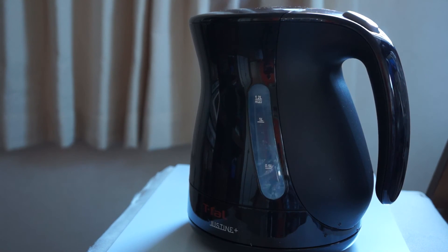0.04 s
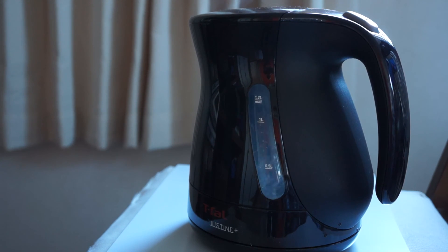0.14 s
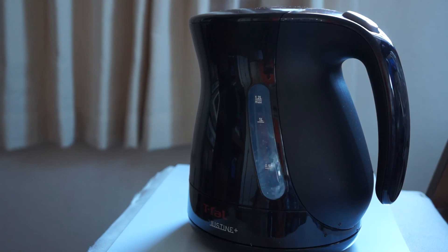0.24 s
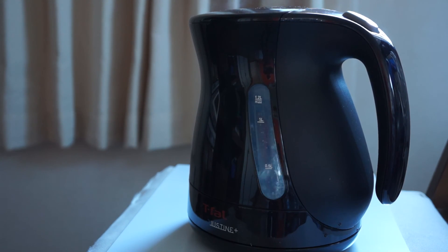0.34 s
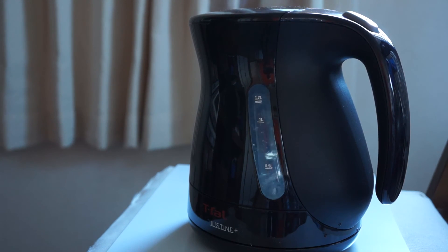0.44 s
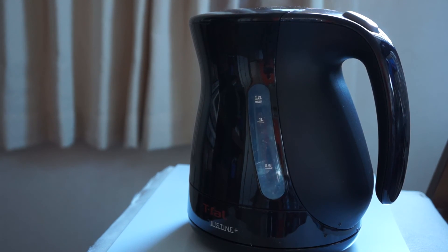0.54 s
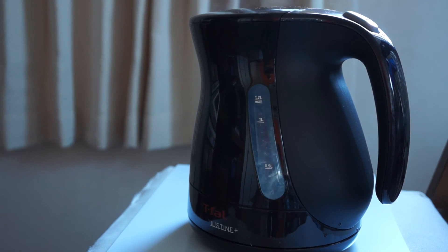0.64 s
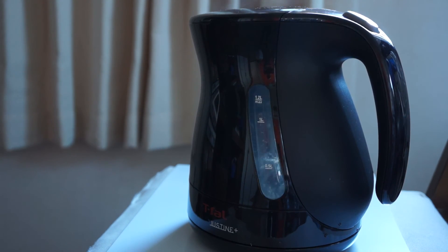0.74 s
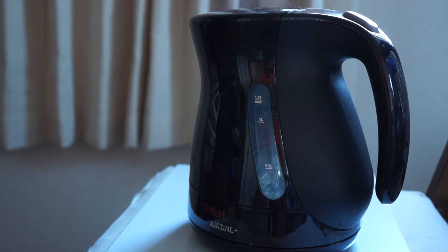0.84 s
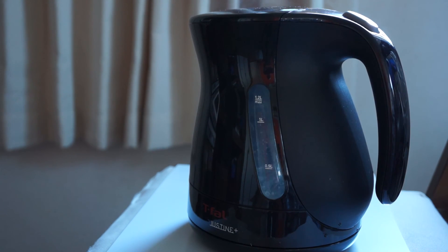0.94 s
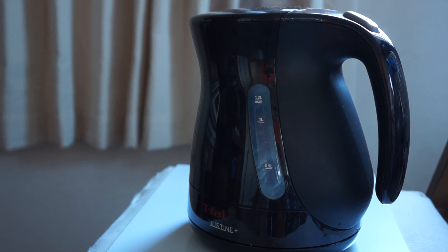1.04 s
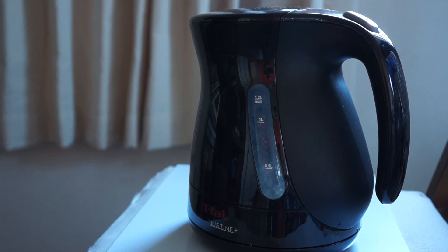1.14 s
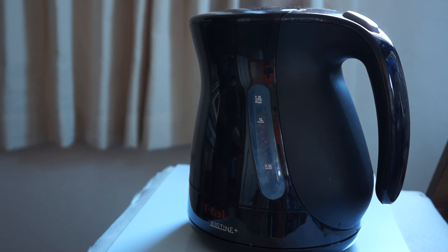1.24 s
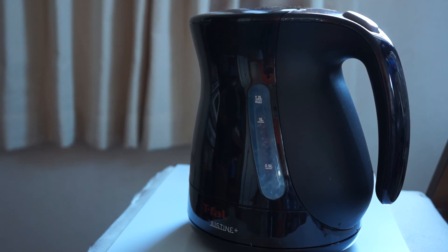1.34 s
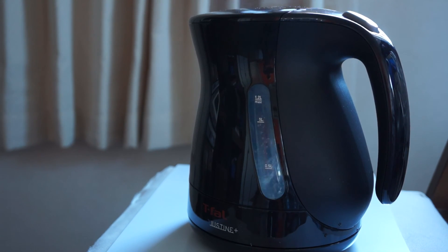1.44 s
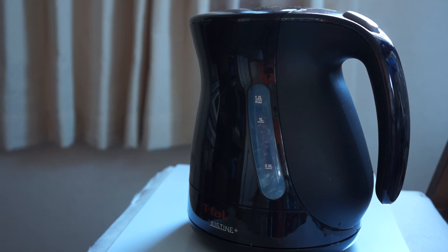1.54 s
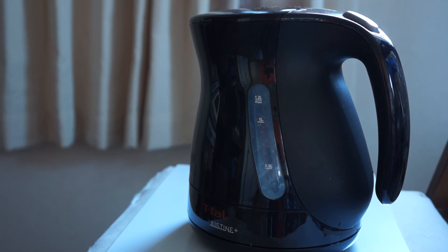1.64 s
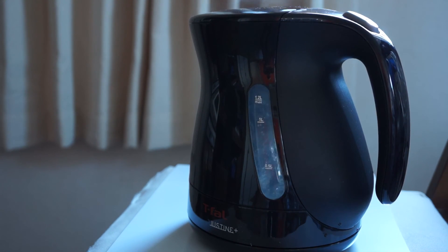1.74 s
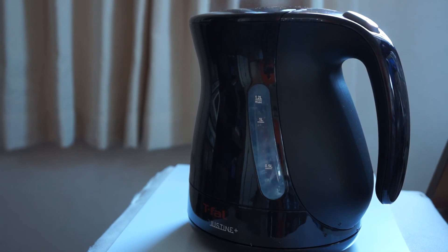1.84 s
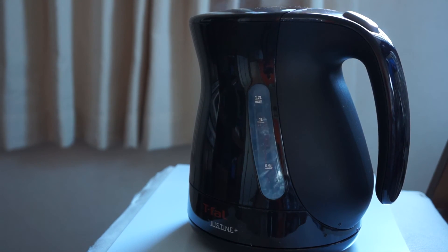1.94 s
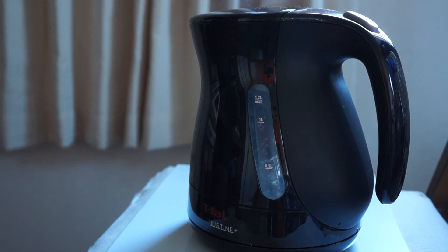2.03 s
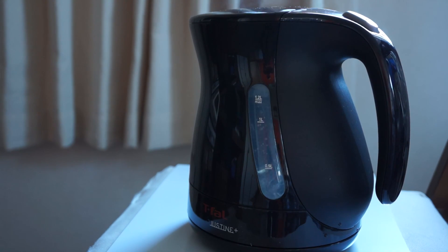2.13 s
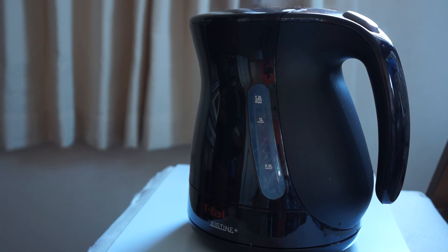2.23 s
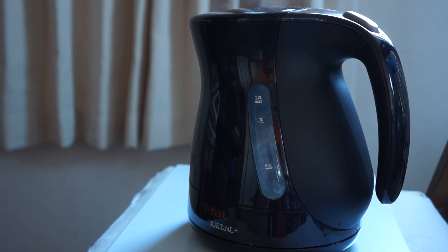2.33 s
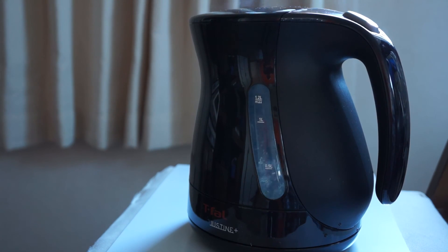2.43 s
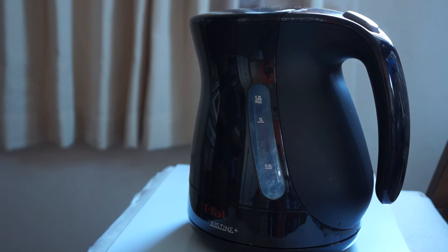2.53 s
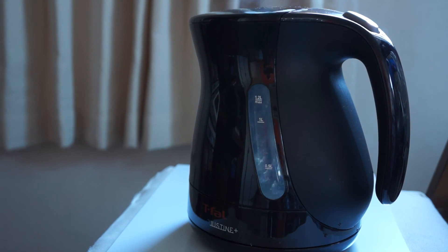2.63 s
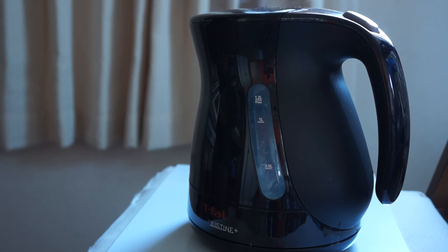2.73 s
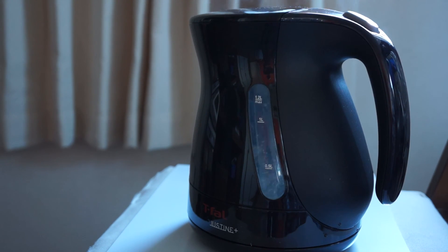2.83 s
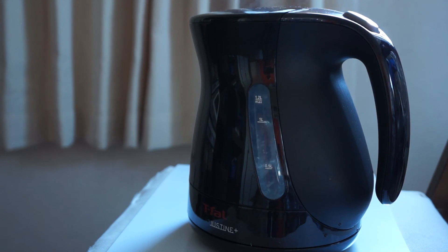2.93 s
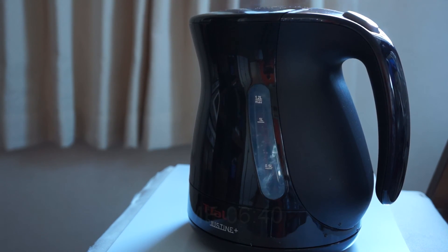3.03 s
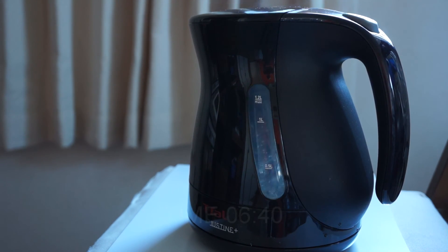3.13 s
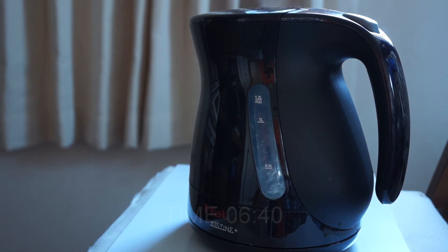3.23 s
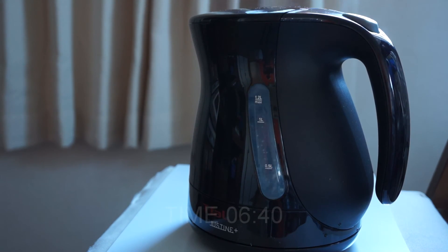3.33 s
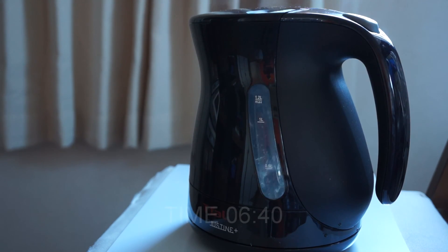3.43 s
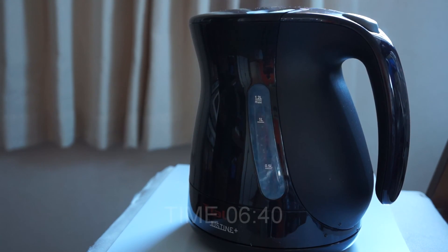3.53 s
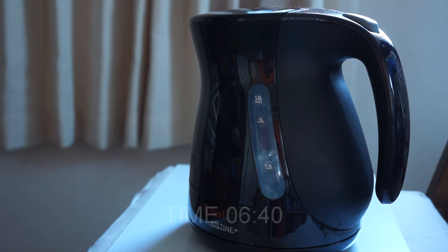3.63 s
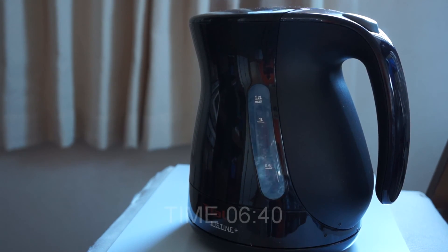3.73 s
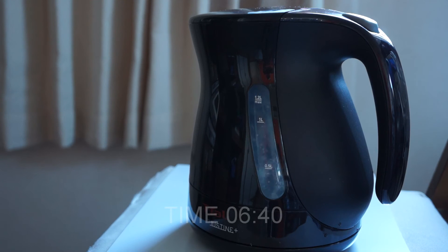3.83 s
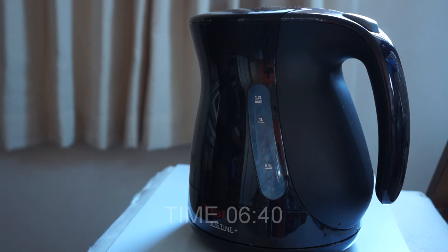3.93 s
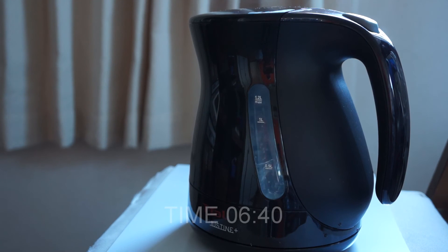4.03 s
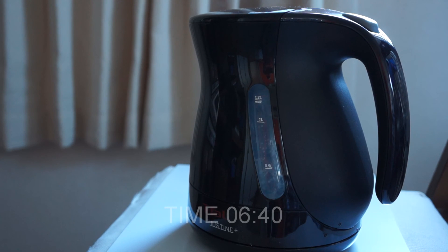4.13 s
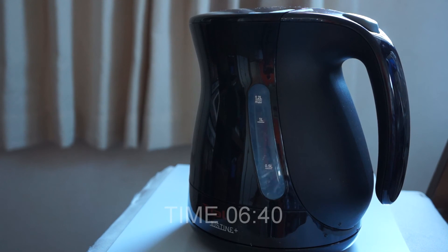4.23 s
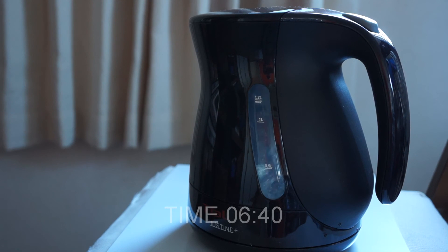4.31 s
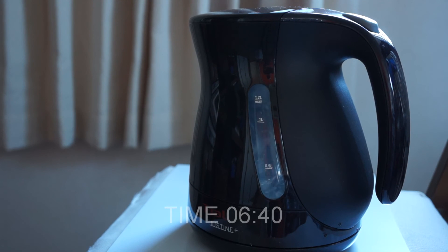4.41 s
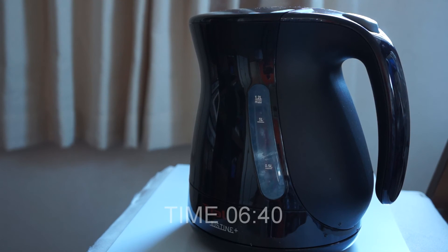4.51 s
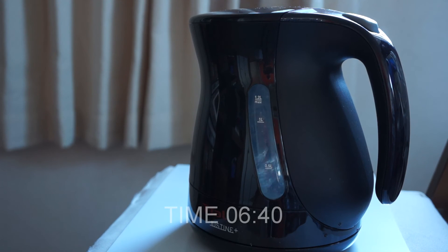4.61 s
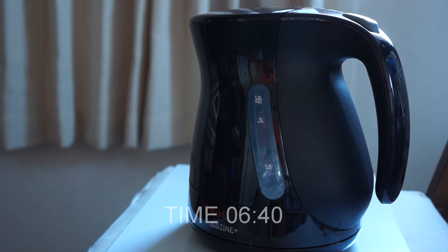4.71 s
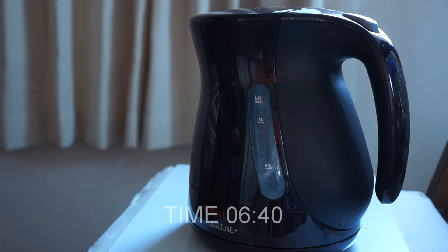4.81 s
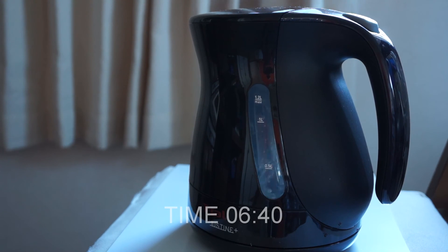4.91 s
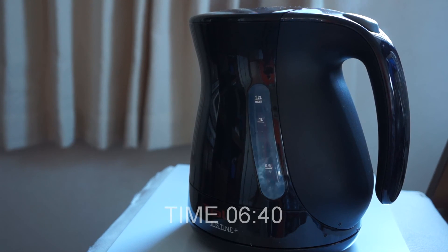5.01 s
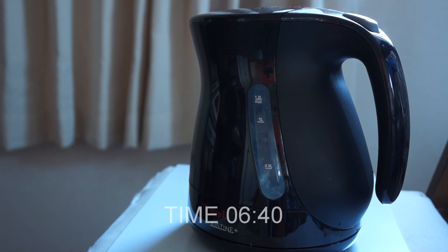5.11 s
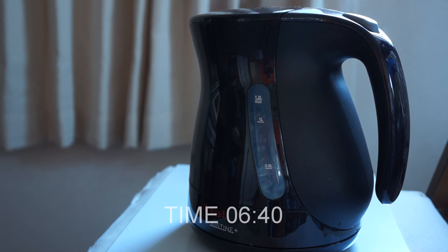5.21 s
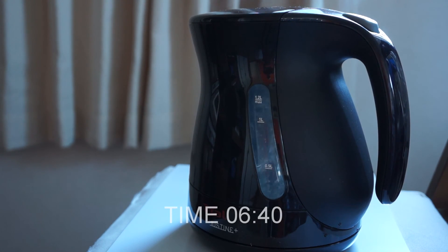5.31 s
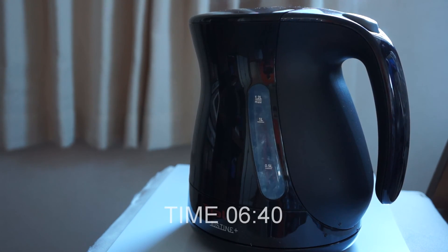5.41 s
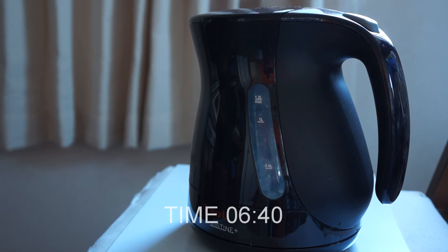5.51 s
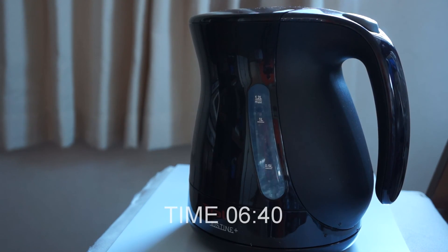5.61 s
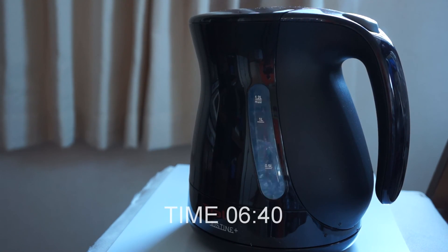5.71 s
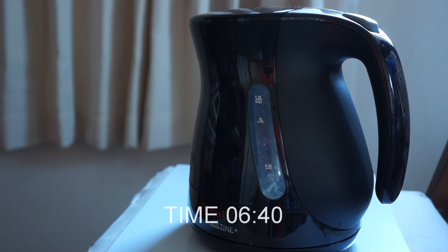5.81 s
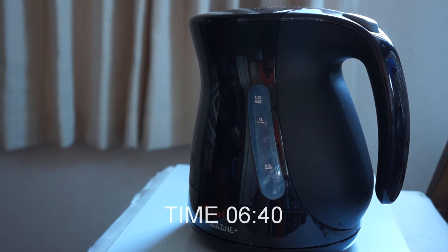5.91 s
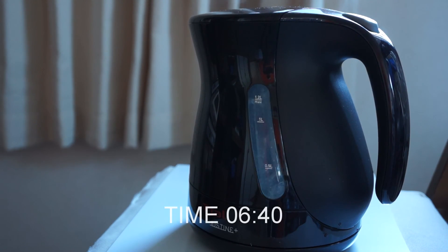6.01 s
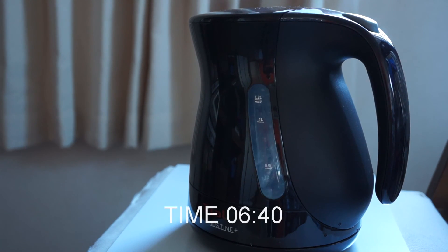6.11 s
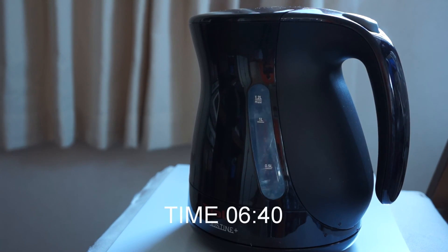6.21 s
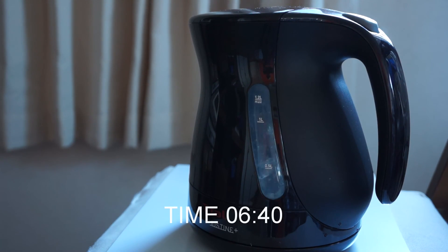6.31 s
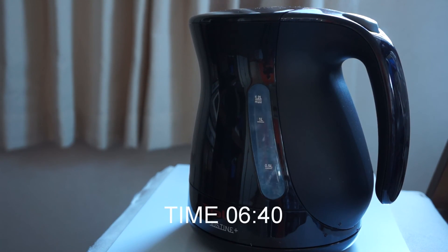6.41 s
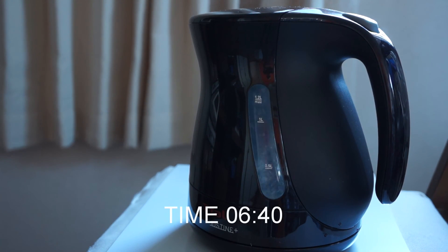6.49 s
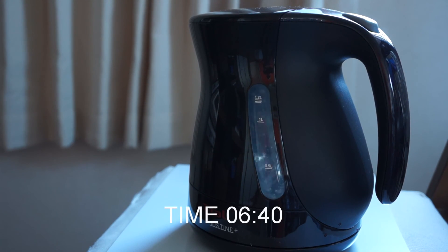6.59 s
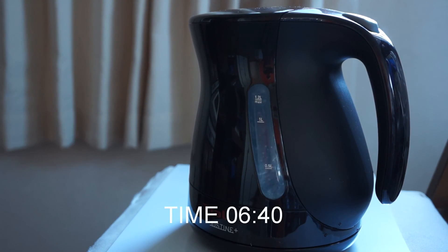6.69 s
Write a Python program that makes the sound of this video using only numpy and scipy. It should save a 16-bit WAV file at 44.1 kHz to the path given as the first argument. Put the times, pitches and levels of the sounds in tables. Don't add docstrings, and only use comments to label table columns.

```python
import sys
import numpy as np
from scipy import signal
from scipy.fft import rfft, irfft, next_fast_len
from scipy.io import wavfile
from scipy.ndimage import map_coordinates

SR = 44100
rng = np.random.default_rng(int(sys.argv[2]) if len(sys.argv) > 2 else 0)


def wav_record(signal):
    frames = np.transpose(np.atleast_2d(signal))
    bounded = np.clip(frames, -1, 1)
    quanta = np.round(bounded * 32767).astype(np.int16)
    wavfile.write(sys.argv[1], SR, quanta)


def magnitude_from_level(level_db):
    exponent = np.asarray(level_db, float) / 20
    return 10 ** exponent


N = 297675

# pitch_hz [Hz], level_db [dB per Hz]
RUMBLE_COLOUR = [(15, -50), (25, -21), (49, -15), (62, -6), (81, -7), (100, -6), (112, 2), (126, -7),
                 (150, -12), (220, -27), (370, -120)]
# pitch_hz [Hz], level_db [dB per Hz]
SWAY_COLOUR = [(15, -72), (25, -42), (48, -10), (81, 0), (101, -6.5), (119, -39), (150, -39), (200, -64),
               (330, -120)]
# pitch_hz [Hz], level_db [dB per Hz]
HISS_COLOUR = [(20, -120), (300, 7.5), (3000, 5), (7000, 2), (12000, 1), (15500, 0), (20000, -4)]
# pitch_hz [Hz], t60_s [s]
ROOM_DECAY = [(300, 0.14), (2000, 0.25), (5000, 0.22), (12000, 0.13)]
# pitch_hz [Hz], share [ratio]
ECHO_SPREAD = [(300, 0.11), (3000, 0.71), (12000, 0.29)]
# pitch_hz [Hz], likeness [0 to 1]
KETTLE_LIKENESS = [(300, 1), (1500, 0.9), (3000, 0.89), (6000, 0.91), (14000, 0.37)]
# pitch_hz [Hz], level_db [dB per Hz]
SNAP_ECHO_COLOUR = [(150, -38), (250, -39), (421, -10), (484, 3), (557, -4), (662, -34), (1700, -13.5),
                    (9330, -29.5), (16000, -42)]
# start_s [s], peak_db [dB], pitch_hz [Hz], brightness_db [dB]
LID_DROPS = [(1.667, -40, 2000, -15), (0.803, -32.5, 3030, -35), (0.822, -32.5, 3910, -30),
             (1.2855, -34, 2000, -19), (1.4562, -32, 3100, -22), (1.7823, -42, 2920, -28),
             (1.8366, -42, 3110, -12), (2.11, -43, 3560, -21), (2.1864, -36, 2660, -30),
             (2.1933, -21.5, 4970, -15), (2.764, -42, 2560, -22), (2.871, -40, 3810, -19),
             (3.008, -45, 2960, -22), (3.312, -38, 2950, -22), (3.721, -41, 2820, -20),
             (3.7542, -26.5, 3220, -19), (3.7629, -26.5, 3420, -16), (3.8187, -41, 2750, -23),
             (4.2217, -36, 2900, -27), (4.768, -38, 2880, -23), (5.036, -38.5, 4400, -15),
             (5.611, -41, 2730, -27), (5.6284, -39, 2790, -14), (5.6377, -27.5, 3150, -14),
             (5.67, -28, 3020, -12), (5.7133, -42, 2760, -23), (5.818, -40, 3870, -18),
             (5.9333, -42, 2740, -22)]
# pitch_hz [Hz], level_db [dB per Hz]
SPLASH_COLOUR = [(500, -59), (1200, 5), (2200, -12), (3200, 12), (5500, 3.5), (7000, -4), (12000, -17),
                 (16000, -27)]
# pitch_hz [Hz], level_db [dB per Hz]
EDGE_COLOUR = [(4000, -34), (7000, -3), (9500, 2.5), (12000, -13), (16000, -16)]
# pitch_hz [Hz], level_db [dB per Hz]
DROP_ECHO_COLOUR = [(800, -19), (2000, 0.5), (3200, 3.5), (5500, -0.5), (7000, -14), (11000, -18),
                    (16000, -35)]
# start_s [s], peak_db [dB], t60_s [s]
SWITCH_BLOWS = [
    (3.1735, -23, .008),
    (3.1755, -12, .01),
    (3.1784, -4, .007),
    (3.18, -8, .005),
    (3.1808, -4, .005),
    (3.1816, -4, .007),
    (3.1893, -14, .006),
]
# pitch_hz [Hz], level_db [dB per Hz]
SNAP_COLOUR = [(120, -51), (250, -20), (500, -8), (800, 0), (1450, -1.5), (2100, -6), (3190, -15),
               (4430, -4), (6880, -24.5), (11000, -16.5), (12500, -32), (16000, -42)]
# pitch_hz [Hz], level_db [dB], t60_s [s]
SHELL_MODES = [(325, -14, 0.048), (446, 0, 0.043), (494, 3, 0.021), (560, 3, 0.12), (726, -3.5, 0.036),
               (836, -20, .03), (990, -19, 0.016), (1174, -18, 0.17), (1370, -4, 0.066), (1498, 8.5, 0.02),
               (2070, -2.5, 0.029), (2780, -5, 0.029), (4630, 2, .012), (10900, -10, .006)]
# start_s [s], level_db [dB]
VIGOUR = [(0.0, -40), (0.41, -42.5), (1.05, -38.5), (1.45, -41), (3.03, -40), (3.18, -40), (3.99, -41),
          (4.44, -41), (4.87, -42), (4.98, -41.5), (6.75, -43)]
# pitch_hz [Hz], level_db [dB per Hz]
DRUM_COLOUR = [(76, -64), (130, -20), (165, -23.5), (184, -8.5), (200, -16.5), (246, -9.5), (330, -5.5),
               (400, -2.5), (480, -1), (540, -4), (600, -11), (800, -17), (1040, -40.5), (1760, -120)]
# pitch_hz [Hz], level_db [dB per Hz]
BURBLE_COLOUR = [(380, -32), (650, 0), (849, 0.5), (1160, -4), (1330, 3), (1520, -5.5), (1810, -3.5),
                 (1900, -4.5), (2600, -30.5), (3380, -19.5), (5720, -120)]
# pitch_hz [Hz], level_db [dB per Hz]
FIZZ_COLOUR = [(1350, -23), (2300, 3.5), (2560, -5.5), (2900, -3.5), (3700, -3.5), (4300, -4.5),
               (4900, -10.5), (5860, -16.5), (7000, -17.5), (9100, -37), (15400, -120)]
# pitch_hz [Hz], level_db [dB per Hz]
SLAP_COLOUR = [(120, -59), (300, -7.5), (600, 2.5), (1500, -2), (2300, -5), (3500, -19), (6000, -25),
               (12000, -45)]
# start_s [s], peak_db [dB], pitch_hz [Hz]
LARGE_BURSTS = [(0.158, -32, 473), (0.265, -26, 484), (0.511, -27.5, 357), (0.569, -46, 417),
                (0.593, -32, 468), (0.629, -27, 407), (1.064, -29, 456), (1.201, -30, 464),
                (1.533, -30, 476), (1.582, -35, 363), (1.655, -28, 500), (2.007, -24, 410),
                (2.267, -25, 444), (2.376, -25.5, 510), (2.426, -31, 463), (2.594, -23.5, 471),
                (2.776, -27, 470), (2.934, -30, 490), (3.091, -27, 450), (3.547, -28.5, 417),
                (3.715, -25, 436), (3.808, -26.5, 613), (4.091, -27.5, 433), (4.244, -27, 450),
                (4.298, -28, 474), (4.425, -29, 509), (4.875, -24, 380), (4.921, -28.5, 367),
                (5.44, -27, 470), (6.377, -25, 439)]
# start_s [s], peak_db [dB], pitch_hz [Hz], slap_db [dB]
SHARP_BURSTS = [(0.088, -31, 867, -18), (0.362, -32.5, 1150, -13), (0.38, -29.5, 1080, -15),
                (0.631, -40, 1270, -10), (0.656, -30, 1190, -12), (0.708, -28, 910, -7.5),
                (0.873, -33.5, 1280, -4.5), (1.148, -31, 940, -24), (1.173, -36, 912, -15),
                (1.313, -28.5, 840, -11), (1.618, -26.5, 1680, -10), (1.78, -34.5, 1300, -3),
                (1.834, -31, 1290, -10), (1.92, -34, 974, -12), (2.193, -32, 1370, -4),
                (2.376, -28.5, 720, -11), (3.009, -30, 1840, -9), (3.595, -32.5, 664, -1.5),
                (3.621, -34, 1250, -14), (3.946, -29, 714, -7), (4.831, -31, 883, -1.5),
                (4.981, -35, 1800, -1), (5.051, -30, 860, -16), (5.452, -31.5, 904, -14),
                (5.818, -26.5, 1630, -6), (5.925, -29.5, 1280, -7.5), (6.227, -32, 821, -22),
                (6.391, -24, 990, -16), (6.484, -40, 880, -21), (6.714, -31, 726, -12)]


def unit(x):
    return x / np.sqrt(np.mean(x ** 2) + 1e-20)


def along(points, hz):
    f, v = np.transpose(points)
    return np.interp(np.log(hz + 1), np.log(f + 1), v)


def coloured(x, colour):
    gain = magnitude_from_level(along(colour, np.fft.rfftfreq(16384, 1 / SR)))
    cepstrum = irfft(np.log(gain + 1e-5))
    folded = np.r_[cepstrum[0], 2 * cepstrum[1:8192], np.zeros(8192)]
    impulse = irfft(np.exp(rfft(folded)))
    return signal.fftconvolve(np.atleast_2d(x), impulse[None], axes=1)[:, :np.shape(x)[-1]]


def wobble(rate):
    knots = rng.standard_normal(int(N * rate / SR) + 4)
    return map_coordinates(knots, [np.arange(N) * rate / SR])


def rings(start_s, gain, hz, cycles, rise, size):
    turns = np.arange(size) / SR * hz[:, None]
    u = turns / cycles
    swell_and_fall = np.e * u * np.exp(-u)
    wave = gain[:, None] * swell_and_fall * np.sin(2 * np.pi * turns * (1 + rise * u))
    at = np.round(start_s * SR).astype(int)[:, None] + np.arange(size)
    return np.bincount(at.ravel(), wave.ravel(), N + size + SR)[:N]


def bursts(start_s, db, t60, colour, size=600, rise=1e-5):
    fall = magnitude_from_level(-60 * np.arange(size) / SR / t60)
    fall *= 1 - np.exp(-np.arange(1, size + 1) / SR / rise)
    at = np.round(start_s * SR).astype(int)[:, None] + np.arange(size)
    cracks = fall * rng.standard_normal(at.shape)
    cracks *= (magnitude_from_level(db) * np.linalg.norm(fall) / np.linalg.norm(cracks, axis=1))[:, None]
    filter_gain = np.linalg.norm(coloured(np.eye(1, 4096), colour))
    train = np.bincount(at.ravel(), cracks.ravel(), N + SR)[:N]
    return coloured(train, colour)[0] / filter_gain


def background():
    mid = magnitude_from_level(-59.5) * unit(coloured(rng.standard_normal(N), RUMBLE_COLOUR))
    side = magnitude_from_level(-54.5) * unit(coloured(rng.standard_normal(N), SWAY_COLOUR))
    noise = rng.standard_normal((3, N))
    hiss = magnitude_from_level(-58) * unit(coloured(noise[:2] + 0.5 * noise[2], HISS_COLOUR))
    return mid + side * [[1], [-1]] + hiss


def room(x, gap_s):
    hz, t, z = signal.stft(rng.standard_normal((2, SR // 2)), SR, nperseg=256)
    apart = along(ECHO_SPREAD, hz)[:, None]
    z = np.array([z[0] + apart * z[1], z[0] - apart * z[1]])
    decay = magnitude_from_level(-60 * t / along(ROOM_DECAY, hz)[:, None])
    tail = signal.istft(z * decay, SR, nperseg=256)[1]
    late = np.pad(x, (int(gap_s * SR), 0))[None]
    return signal.fftconvolve(late, tail / np.linalg.norm(tail[0]), axes=1)[:, :N]


def walls():
    blow = np.zeros(N)
    blow[round(SWITCH_BLOWS[-2][0] * SR)] = 1
    blow = coloured(blow, SNAP_ECHO_COLOUR)[0]
    return magnitude_from_level(7.0) * room(blow / np.linalg.norm(blow), gap_s=.002)


def wide(x):
    hz, _, z = signal.stft(x, SR, nperseg=256)
    likeness = np.clip(along(KETTLE_LIKENESS, hz), 0, .999)
    share = np.sqrt((1 - likeness) / 2)[:, None]
    scattered = z * share * np.exp(2j * np.pi * rng.random(z.shape))
    side = signal.istft(scattered, SR, nperseg=256)[1][:N]
    return np.array([x + side, x - side])


def spray():
    start_s, db, hz, bright_db = np.transpose(LID_DROPS)
    tap = rings(start_s, magnitude_from_level(db + 1.0), hz, cycles=.8, rise=-0.0011, size=300)
    tap += bursts(start_s, db - 8.0, 0.015, SPLASH_COLOUR)
    tap += bursts(start_s, db + bright_db + 4.5, 0.005, EDGE_COLOUR)
    return tap + bursts(start_s + 0.0042, db - 17, 0.13, DROP_ECHO_COLOUR, size=7000, rise=0.0069)


def switch():
    t = np.arange(SR // 4) / SR
    out = np.zeros(N)
    for start_s, db, t60 in SWITCH_BLOWS:
        envelope = magnitude_from_level(-60 * t / t60) * (1 - np.exp(-t / 0.00038))
        crack = coloured(rng.standard_normal(len(t)) * envelope, SNAP_COLOUR)[0]
        out[round(start_s * SR):][:len(t)] += magnitude_from_level(db - 4.0) * crack / abs(crack).max()
    ring = np.zeros(len(t))
    for k, (hz, db, t60) in enumerate(SHELL_MODES):
        ring += magnitude_from_level(db - 60 * t / t60) * (-1) ** k * np.sin(2 * np.pi * hz * t)
    out[round(3.1795 * SR):][:len(t)] += magnitude_from_level(-14.5) * ring * (1 - np.exp(-t / 0.00088))
    return coloured(out, [(30, -36), (150, -7), (260, -2), (20000, 4.0)])[0]


def bubbles(colour, lo_hz, hi_hz, cycles, spread_db, wash_db, count, size):
    draw = rng.random((count, 4))
    hz = lo_hz * (hi_hz / lo_hz) ** draw[:, 1]
    strength = np.minimum(-np.log(1 - draw[:, 2]), 3.5)
    gain = hz * magnitude_from_level(spread_db * strength) * np.sign(draw[:, 3] - .5)
    pops = rings(draw[:, 0] * N / SR, gain, hz, cycles, rise=0.056, size=size)
    pops = unit(coloured(pops, colour))[0]
    wash = unit(coloured(rng.standard_normal(N), colour))[0]
    return unit(pops + magnitude_from_level(wash_db) * wash)


def single_bursts():
    start_s, db, hz = np.transpose(LARGE_BURSTS)
    out = rings(start_s + .0015, magnitude_from_level(db - 2.5), hz, cycles=1.05, rise=0.0066, size=1500)
    start_s, db, hz, slap_db = np.transpose(SHARP_BURSTS)
    start_s = start_s + .001
    out += bursts(start_s, db + slap_db - 1, 0.037, SLAP_COLOUR)
    return out + rings(start_s, magnitude_from_level(db + .5), hz, cycles=0.78, rise=0.0031, size=600)


def boil():
    s, db = np.transpose(VIGOUR)
    swing_db = np.interp(np.arange(N) / SR, s, db - db.mean())
    heaves_per_s = 12
    shared = wobble(heaves_per_s)

    def loudness(under_db, follows):
        heave_db = 1.5 * (0.67 * shared + 0.64 * wobble(heaves_per_s))
        return magnitude_from_level(db.mean() + under_db + follows * swing_db + heave_db)

    big = loudness(under_db=0, follows=1)
    small = loudness(under_db=-9, follows=0.81)
    fizz = loudness(under_db=-18.5, follows=0.55)
    water = magnitude_from_level(1.0) * big * bubbles(DRUM_COLOUR, 158, 745, cycles=0.59, spread_db=1.06, wash_db=-2.0,
                                     count=2600, size=900)
    water += magnitude_from_level(1.5) * small * bubbles(BURBLE_COLOUR, 600, 2600, cycles=0.69, spread_db=4.0, wash_db=-0.5,
                                        count=1600, size=500)
    water += fizz * bubbles(FIZZ_COLOUR, 2060, 8600, cycles=1.84, spread_db=3.5, wash_db=2.0,
                            count=6000, size=200)
    churn = rng.random((300, 2))
    water += small * bursts(churn[:, 0] * N / SR, 0.88 + 8.8 * churn[:, 1], 0.017, SLAP_COLOUR)
    return water + single_bursts()


def scene():
    water, snap = boil(), switch()
    echoes = magnitude_from_level(-15.5) * room(water, gap_s=0.0054) + magnitude_from_level(-11.5) * room(snap, gap_s=0.0027) + walls()
    lean = magnitude_from_level([[-.7], [.7]])
    return lean * (wide(water + spray() + snap) + echoes) + background()


def roll_off(x):
    return signal.sosfilt(signal.butter(12, 16800, fs=SR, output="sos"), x)


def record(dry):
    ceiling, top_hz = .95, 15800
    held = dry / (1 + abs(dry / ceiling) ** 4) ** (1 / 4)
    m = next_fast_len(N)
    passed = np.fft.rfftfreq(m, 1 / SR) < top_hz
    limited = irfft(rfft(held, m) * passed, m)[:, :N]
    return roll_off(limited)


dry = scene()
out = record(dry)
wav_record(out)
```